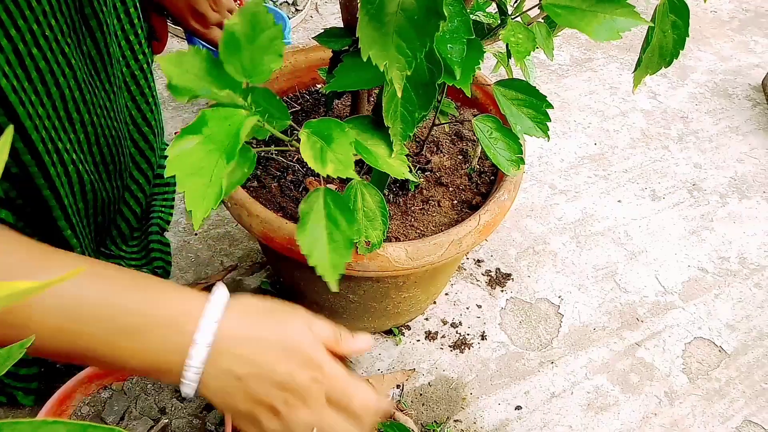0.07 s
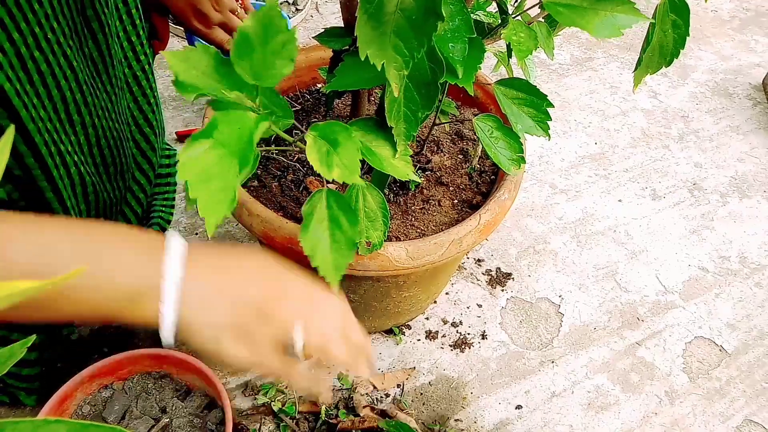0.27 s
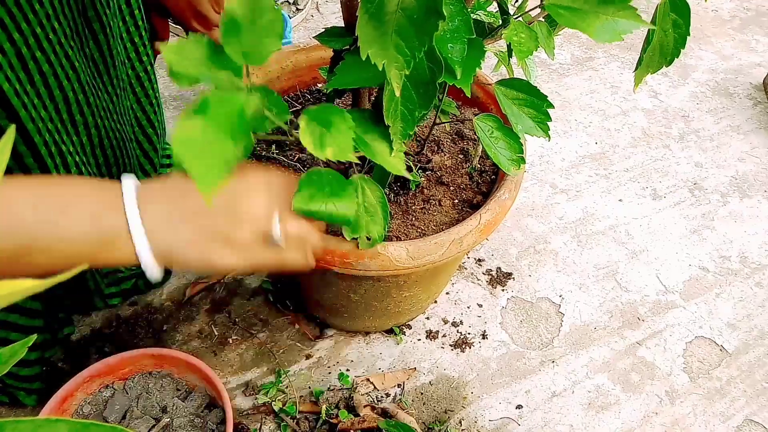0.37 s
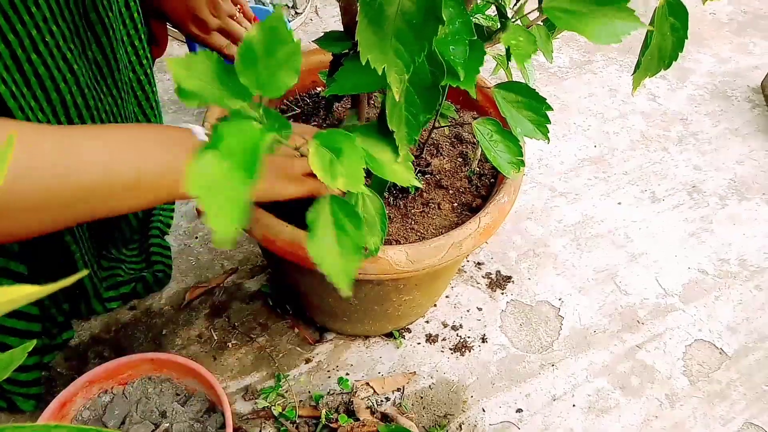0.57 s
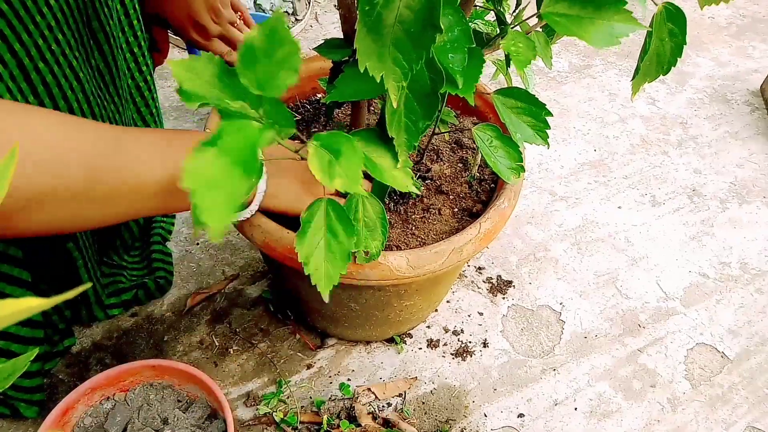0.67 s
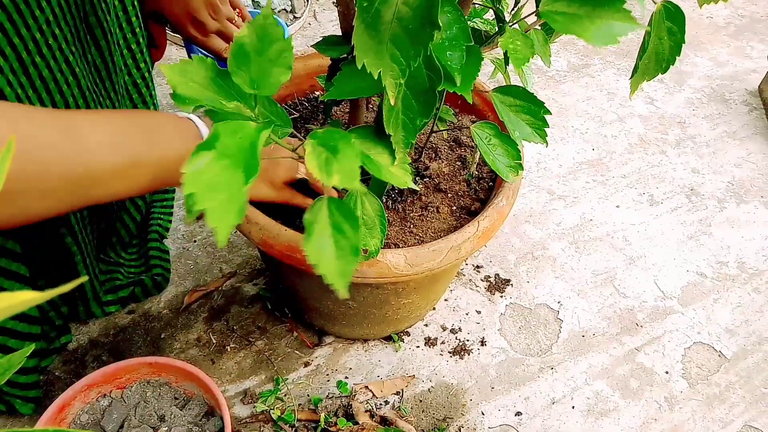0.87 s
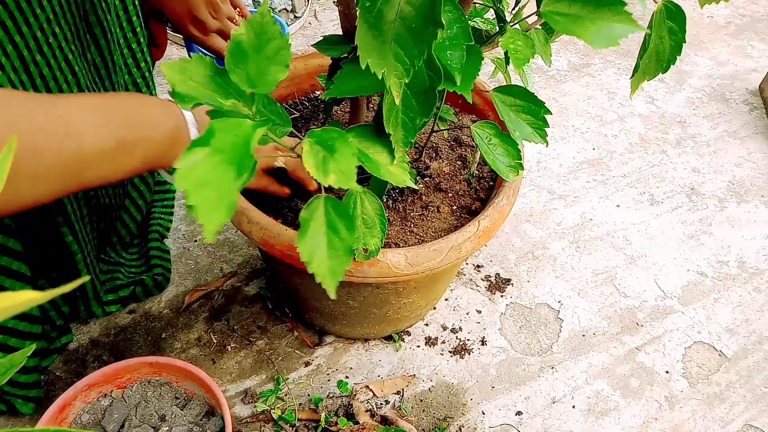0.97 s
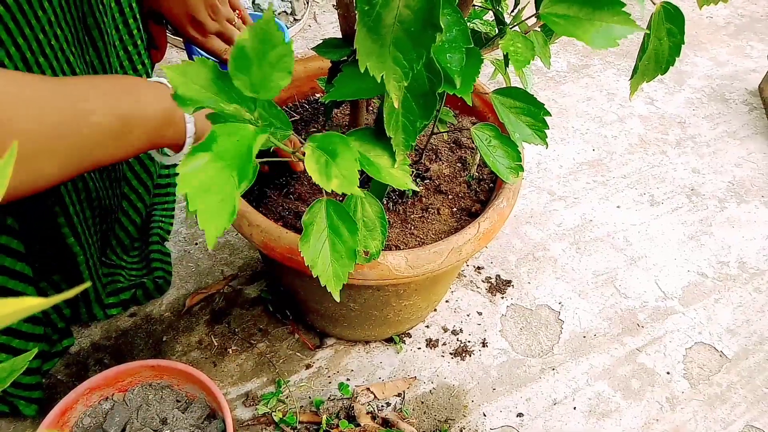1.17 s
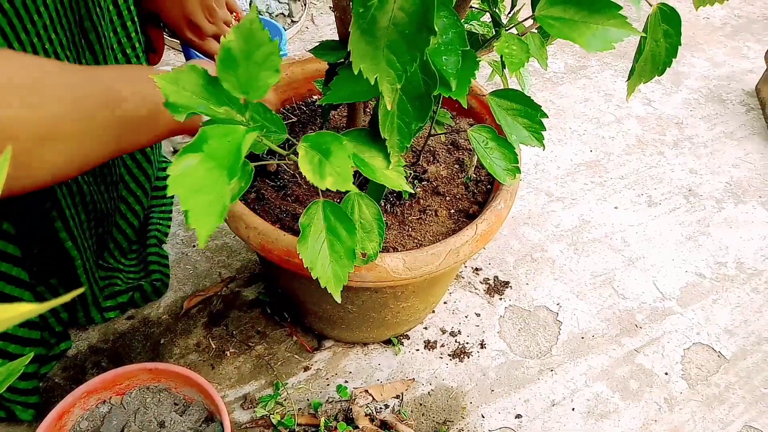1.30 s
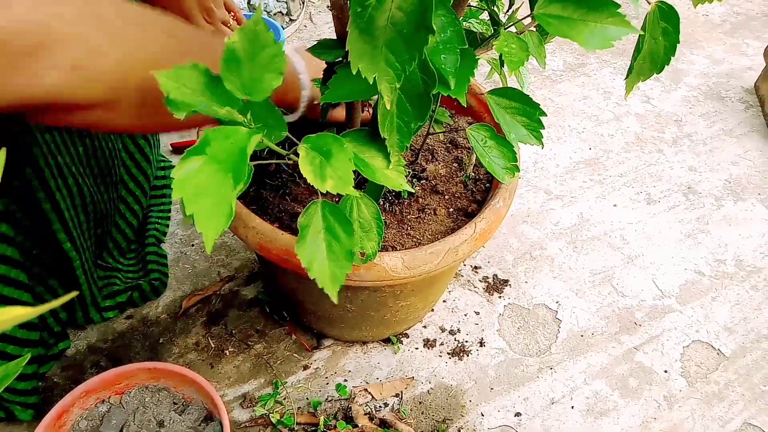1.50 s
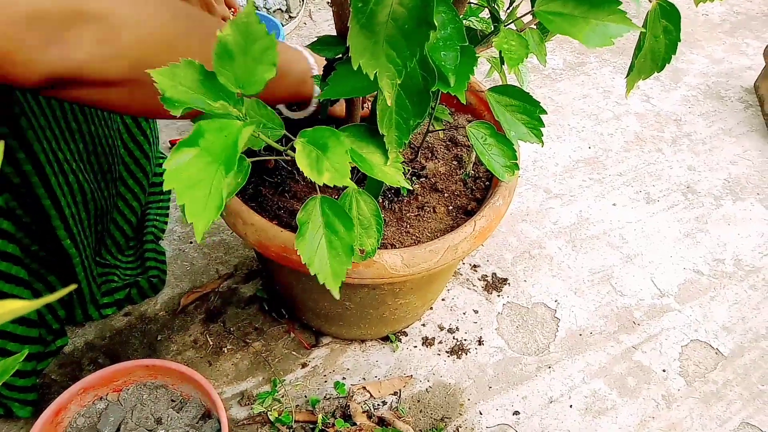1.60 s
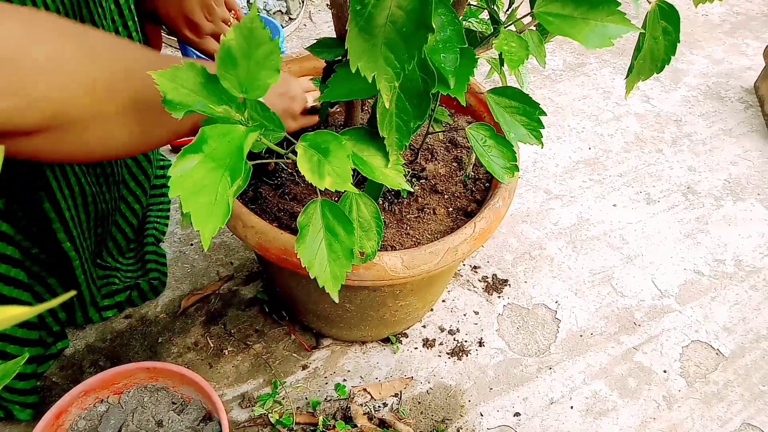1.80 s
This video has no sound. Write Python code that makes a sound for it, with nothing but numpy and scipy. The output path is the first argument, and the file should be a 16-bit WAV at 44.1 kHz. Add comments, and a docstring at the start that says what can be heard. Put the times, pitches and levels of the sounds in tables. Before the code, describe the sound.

Dry leaves crackle and snap as a hand tears them loose close by. A few light, hollow knocks on a flower pot follow, then fingers rustle and scrape in mulch while birds whistle faintly in a quiet yard.

```python
"""A hand grazes a leaf, then tears dry leaves loose close by: stalks snap and soil crumbles, each
fracture a brief, damped vibration. Reaching into a flower pot, something hard, probably a bangle,
knocks on it and excites the modes of its wall and hollow. The hand brushes the wall and the fingers
rustle in the mulch. From about 1.1 s birds whistle faintly, and last the fingers scrape in the mulch.
Throughout, the quiet paved yard adds short echoes, a distant rumble and a high hiss."""
import sys
import numpy as np
from scipy import signal
from scipy.fft import rfft, irfft, next_fast_len
from scipy.io import wavfile
from scipy.ndimage import uniform_filter1d, map_coordinates

SR = 44100
rng = np.random.default_rng(int(sys.argv[2]) if len(sys.argv) > 2 else 0)


def master(y):
    """Save y as 16-bit WAV."""
    cut = np.clip(np.atleast_2d(y).T, -1, 1)
    pcm = np.round(cut * 32767)  # scale
    wavfile.write(sys.argv[1], SR, pcm.astype(np.int16))


N = 81585
T = np.arange(N) / SR
BAND_LIMIT_HZ = 15750

# spectrum of leaves rubbing and tearing: frequency_hz, gain_db
TEAR_SPECTRUM = [(600, -54), (1500, -8.5), (3800, -12.5), (4900, -4), (6300, -2.5), (7700, -7.5),
                 (8900, 4.5), (10400, 5), (12000, -2.5), (15500, -13.5)]


def amp(db):
    """Amplitude ratio of a level in decibels."""
    return 10 ** (np.asarray(db) / 20)


def unit(x):
    """Normalisation to rms 1."""
    return x / np.sqrt(np.mean(x ** 2) + 1e-20)


def along(points, hz):
    """Interpolation of (frequency_hz, value) points on a logarithmic frequency axis."""
    f, v = np.transpose(points)
    return np.interp(np.log(hz + 1), np.log(f + 1), v)


def envelope(rows):
    """Amplitude envelope through (time_s, level_db) rows, silent outside them."""
    return amp(np.interp(T, *np.transpose(rows), left=-np.inf, right=-np.inf))


def wobble(knots_per_s):
    """Smooth random modulation: a spline through Gaussian values."""
    return map_coordinates(rng.standard_normal(int(N * knots_per_s / SR) + 4), [T * knots_per_s])


def filtered(x, response):
    """Linear filtering: the spectrum is multiplied by a frequency response."""
    size = next_fast_len(2 * x.shape[-1])
    return irfft(rfft(x, size) * response(np.fft.rfftfreq(size, 1 / SR)), size)[..., :x.shape[-1]]


def coloured(x, points, size=4096):
    """Minimum-phase filtering to a (frequency_hz, gain_db) shape, by folding the cepstrum."""
    cepstrum = irfft(np.log(amp(along(points, np.fft.rfftfreq(size, 1 / SR)))))
    cepstrum[1:size // 2] *= 2
    cepstrum[size // 2 + 1:] = 0
    return signal.fftconvolve(x, irfft(np.exp(rfft(cepstrum))))[:len(x)]


def cut(x, hz, kind, order=3):
    """Maximally flat high-pass or low-pass filtering."""
    return signal.sosfilt(signal.butter(order, hz, kind, fs=SR, output="sos"), x)


def resonator(x, hz, q):
    """Forced response of a single damped mode of quality factor q."""
    return signal.lfilter(*signal.iirpeak(min(hz, BAND_LIMIT_HZ), q, SR), x)


def modal_response(modes, f):
    """Superposition of (frequency_hz, bandwidth_hz, gain_db) modes of alternating sign."""
    return sum((-1) ** k * amp(db) * 1j * f * width / (hz * hz - f * f + 1j * f * width)
               for k, (hz, width, db) in enumerate(modes))


def add_transient(track, start_s, db, x):
    """Energy scaling: x is mixed in with the energy of 4 ms at the given level."""
    i = round(start_s * SR)
    track[i:i + len(x)] += (amp(db) * x * np.sqrt(.004 * SR / np.sum(x ** 2)))[:N - i]


def crackle(spectrum, per_s, spread_db, rub, top_hz=15000):
    """Tiny fractures ring as damped sinusoids at random times, over friction noise; rms 1."""
    t, t60_s = T[:SR // 50], .005
    when, pitch, size = rng.random((6000, 3))[:int(per_s * N / SR)].T
    rings = np.sin(2 * np.pi * (300 + pitch[:, None] * top_hz) * t) * amp(-60 * t / t60_s)
    rings *= amp(spread_db * np.minimum(-np.log(1 - size), 3))[:, None]
    at = (when * N).astype(int)[:, None] + np.arange(len(t))
    grains = coloured(np.bincount(at.ravel(), rings.ravel(), N + len(t))[:N], spectrum)
    power = np.abs(uniform_filter1d(grains ** 2, size=900))
    grains /= np.sqrt(power + power.mean() / 20)  # evens out the loudness
    friction = unit(coloured(rng.standard_normal(N), spectrum))
    return unit(grains + rub * friction)


def snapping_stalks():
    """Brittle fracture: a burst excites each piece's resonances; thin pieces radiate no bass."""
    # stalks and leaves breaking: start_s, relative_level_db, t60_s, low_cutoff_hz
    breaks = [(.2205, -47, 0.0077, 7000), (0.2341, -21, 0.0058, 5180), (0.2458, -27.5, 0.0055, 6360),
              (0.2482, -21, 0.01, 4250), (.2550, -21, 0.021, 3700), (0.272, -21.5, 0.0069, 4000),
              (.2760, -21, 0.011, 4150), (.2785, -21, 0.007, 620), (0.2825, -31, 0.0054, 4400),
              (0.2839, -20, 0.0051, 4240), (0.2903, -34, 0.012, 3800), (0.3094, -27, .0088, 5330),
              (0.317, -27.5, 0.027, 2640), (0.3218, -28.5, 0.018, 2920), (0.333, -29, 0.016, 3950),
              (0.345, -30.5, 0.0045, 2080), (0.3555, -31.5, 0.014, 3400), (0.3579, -34.5, 0.014, 1380),
              (0.3885, -32.5, 0.01, 2900), (0.393, -36.5, .0083, 4070), (0.4081, -38.5, 0.0056, 4450),
              (0.4148, -28.5, 0.022, 1430), (.4251, -36, 0.043, 1790), (.4490, -34.5, 0.011, 3130),
              (0.4724, -46, 0.0082, 2770), (0.5021, -34, .014, 2680), (0.5285, -34.5, 0.01, 6000),
              (0.586, -43.5, 0.031, 2790), (.5998, -43, 0.0059, 7840), (.623, -49, 0.009, 6000),
              (0.883, -49, 0.028, 2490), (0.8924, -40, 0.0074, 2420), (0.9829, -43, 0.037, 7600),
              (1.0034, -33, 0.007, 3170), (1.0560, -40.5, 0.066, 2900), (1.3175, -58, 0.018, 1350),
              (1.328, -57, 0.015, 3070)]
    # spectrum of a dry leaf breaking: frequency_hz, gain_db
    leaf_spectrum = [(400, -53), (800, -17), (1600, -4), (2400, -6.5), (3800, -3), (4900, -1.5),
                     (6300, -2.5), (7600, -9.5), (8800, -2.5), (10400, -1), (12000, -12), (15500, -8)]
    out, t, rise_s = np.zeros(N), T[:SR // 10], .0004
    for start_s, db, t60_s, low_hz in breaks:
        burst = rng.standard_normal(len(t)) * amp(-60 * t / t60_s) * (1 - np.exp(-t / rise_s))
        burst[round(rise_s * SR)] += 2.05  # the click at the instant of breaking
        main_mode = resonator(burst, 1.29 * low_hz, q=13)
        overtones = sum(resonator(burst, hz, q=20) for hz in rng.uniform(low_hz, 12000, 4))
        piece = coloured(burst + 2.56 * main_mode + 1.84 * overtones, leaf_spectrum)
        add_transient(out, start_s, db - 1.5, cut(piece, low_hz, "high", order=8))
    return out


def tearing_leaves():
    """Friction and fracture: one leaf is grazed, then a handful tears loose and settles."""
    # envelope of the graze: time_s, level_db
    graze_levels = [(.085, -94), (.102, -54.5), (.125, -76), (.15, -87)]
    # envelope of the pull: time_s, level_db
    pull_levels = [(.2, -108), (.228, -53.5), (.244, -55), (.250, -28), (.264, -32), (.278, -21.5),
                   (.298, -34), (.314, -43), (.335, -41), (.375, -41.5), (.43, -46), (.485, -52.5),
                   (.54, -60.5), (.58, -68.5), (.66, -56.5), (.72, -57.5)]
    graze = cut(crackle(TEAR_SPECTRUM, per_s=2300, spread_db=-11, rub=.66), 8260, "high")
    tear = crackle(TEAR_SPECTRUM, per_s=2000, spread_db=3, rub=.8)
    return envelope(graze_levels) * graze + envelope(pull_levels) * tear


def crumbling_soil():
    """Granular fracture: soil breaks into crumbs under the pull."""
    # envelope of the crumbling: time_s, level_db
    levels = [(.24, -60), (.256, -37.5), (.268, -46), (.279, -32), (.296, -48), (.324, -43.5), (.38, -46.5),
              (.425, -49.5), (.49, -57), (.57, -72), (.66, -69.5)]
    # spectrum of the crumbs: frequency_hz, gain_db
    spectrum = [(400, -28.5), (750, -15.5), (1600, 0), (2300, 1), (3600, 5.5), (5000, -2), (9000, -33)]
    return envelope(levels) * crackle(spectrum, per_s=990, spread_db=4.5, rub=.38, top_hz=6000)


def pot_knocks():
    """Impact excitation: a blow and gritty chatter ring the pot's wall and, more slowly, its hollow."""
    # contacts with the pot: start_s, level_db, chatter_t60_s, high_cutoff_hz
    contacts = [(.6772, -24, 0.032, 4970), (.6965, -22, 0.029, 8000), (.7070, -28.5, 0.02, 4360),
                (.7135, -34, 0.027, 3240), (.7350, -41, 0.14, 1930), (.7755, -37, 0.036, 3030),
                (.7825, -40, 0.059, 2530)]
    # modes of the wall: frequency_hz, bandwidth_hz, gain_db
    wall_modes = [(1102, 110, -9), (1324, 80, -6), (1554, 130, -7.5), (2160, 104, 4), (2500, 80, .5),
                  (2710, 130, -6.5), (3210, 270, -4), (3290, 76, 6), (3420, 114, 2.5), (4570, 204, -3),
                  (5270, 138, -9.5), (7000, 600, -32)]
    # modes of the air in the hollow: frequency_hz, t60_s, gain_db
    air_modes = [(601, 0.32, -1.5), (698.5, 0.28, 1.5)]
    out, t, air_rise_s = np.zeros(N), T[:SR // 3], .041
    for start_s, db, t60_s, high_hz in contacts:
        force = (t == 0) + .1 * rng.standard_normal(len(t)) * amp(-60 * t / t60_s)
        wall = filtered(force, lambda f: modal_response(wall_modes, f))
        crack = amp(-21) * cut(force, 770, "high")
        add_transient(out, start_s, db, cut(wall + crack, high_hz, "low", order=4))
        hollow = sum(amp(mode_db - 60 * t / ring_s) * np.sin(2 * np.pi * (hz * t + rng.random()))
                     for hz, ring_s, mode_db in air_modes)
        add_transient(out, start_s, db - 29, hollow * (1 - np.exp(-t / air_rise_s)))
    return out


def mulch_rustle():
    """Friction and fracture: the fingers stir the mulch in short swells."""
    # envelope of the stirring: time_s, level_db
    levels = [(.85, -104), (.875, -50.5), (.895, -50.5), (.925, -55.5), (.975, -64.5), (1.005, -52.5),
              (1.045, -50.5), (1.062, -45), (1.095, -65), (1.15, -61), (1.21, -79), (1.295, -64.5),
              (1.325, -47), (1.36, -60.5), (1.42, -82)]
    # spectrum of the mulch: frequency_hz, gain_db
    spectrum = [(350, -37), (620, -13), (850, -28), (1500, 0), (2000, 6), (3200, 8), (5000, -6), (7500, -2),
                (10000, 13.5), (12500, -7.5), (15500, 6)]
    return envelope(levels) * crackle(spectrum, per_s=2800, spread_db=2, rub=.85, top_hz=14040)


def mulch_scrape():
    """Sliding friction: a steady, gritty rub that slowly grows."""
    # spectrum of the scrape: frequency_hz, gain_db
    spectrum = [(400, -36), (700, -11.5), (1000, -3), (1300, -5), (1750, 3), (2150, 0), (2550, -3),
                (2950, -2), (3500, 0.5), (4100, -7), (5200, -10), (7300, -22.5), (9800, -5), (12500, -21),
                (15500, -21)]
    start_s, rise_s, swell_db_per_s = 1.67, .062, 14.5
    age = T - start_s
    stroke = np.clip(age / rise_s, 0, 1) * amp(-48 + swell_db_per_s * age)
    return stroke * crackle(spectrum, per_s=2600, spread_db=0, rub=1.2, top_hz=7000)


def pot_brush():
    """Resonance driven by friction: the hand draws a short hollow note from the pot wall."""
    # envelope of the brushing: time_s, level_db
    levels = [(.69, -74), (.73, -59), (.79, -55.5), (.85, -72.5), (.95, -72), (.995, -73), (1.033, -54),
              (1.065, -58.5), (1.10, -80)]
    # modes of the brushed wall: frequency_hz, bandwidth_hz, gain_db
    modes = [(613, 38, -0.5), (1360, 155, -4), (1550, 64, 4.5), (2500, 280, -21)]
    return envelope(levels) * unit(filtered(rng.standard_normal(N), lambda f: modal_response(modes, f)))


def bird_tone(start_s, length_s, hz):
    """Random frequency and amplitude modulation make a soft-edged sinusoid waver and flutter."""
    edge_s, waver_hz, flutter_db = .018, 24, 2.6
    gate = np.clip(np.minimum(T - start_s, start_s + length_s - T) / edge_s + .5, 0, 1)
    phase = 2 * np.pi * np.cumsum(hz + waver_hz * wobble(knots_per_s=180)) / SR
    return gate * np.sqrt(2) * np.sin(phase) * amp(flutter_db * wobble(knots_per_s=110))


def birds():
    """Frequency glides: one bird slides down from a high pitch; others hold thin, broken notes."""
    # thin notes: start_s, length_s, first_hz, last_hz, relative_level_db
    notes = [(1.07, .08, 2700, 2660, -67), (1.15, .06, 3660, 3680, -67), (1.14, .10, 3010, 2970, -68),
             (1.12, .09, 3350, 3325, -68), (1.22, .17, 3315, 3340, -60.5), (1.42, .08, 3310, 3340, -60),
             (1.40, .04, 2970, 3000, -63), (1.38, .11, 3670, 3640, -68), (1.55, .15, 3345, 3270, -66.5)]
    # falling whistles: start_s, length_s, top_hz, half_fall_s, peak_level_db
    whistles = [(1.220, 0.084, 3894, .078, -57), (1.461, 0.3, 4010, 0.064, -54.5)]
    floor_hz, peak_s, fade_db_per_s = 1476, .063, 115
    out = np.zeros(N)
    for start_s, length_s, first_hz, last_hz, db in notes:
        hz = np.interp(T, [start_s, start_s + length_s], [first_hz, last_hz])
        out += amp(db - 2.5) * bird_tone(start_s, length_s, hz)
    for start_s, length_s, top_hz, half_fall_s, db in whistles:
        age = np.maximum(T - start_s, 0)
        hz = floor_hz + (top_hz - floor_hz) / (1 + (age / half_fall_s) ** 2.1)
        out += amp(db - fade_db_per_s * np.abs(age - peak_s)) * bird_tone(start_s, length_s, hz)
    return out + amp(-9) * early_reflections(out)


def early_reflections(x, count=8, longest_s=.012):
    """Reflection: the paving and the pots return a few delayed copies."""
    taps = np.zeros(SR // 10)
    taps[(SR * longest_s * rng.uniform(.2, 1, count)).astype(int)] = rng.choice([-1, 1], count)
    return signal.fftconvolve(x, taps / np.sqrt(count))[:N]


def yard_reverb(x):
    """Reverberation: a diffuse tail decays exponentially, the bass lasting longest."""
    # reverberation time of the yard: frequency_hz, t60_s
    decay_times = [(400, 0.87), (2500, 0.31), (6000, 0.49), (14000, 0.29)]
    hz, t, noise = signal.stft(rng.standard_normal(SR // 2), SR, nperseg=256)
    tail = signal.istft(noise * amp(-60 * t / along(decay_times, hz)[:, None]), SR, nperseg=256)[1]
    return signal.fftconvolve(x, tail / np.linalg.norm(tail))[:N]


def background():
    """Ambient noise: a distant rumble whose bass drifts in level, and a band of high hiss."""
    # spectrum of the rumble: frequency_hz, gain_db
    rumble_spectrum = [(20, -12), (48, -44), (65, -6), (110, 0), (170, -4.5), (260, -10.5), (420, -16),
                       (1000, -20.5), (3000, -24.5), (7000, -28), (15000, -53)]
    # spectrum of the hiss: frequency_hz, gain_db
    hiss_spectrum = [(4000, -46), (7800, -20), (8500, 10.5), (9000, 16), (9500, 9), (10600, 15.5),
                     (11300, 14), (12200, -16), (15500, -11)]
    noise = lambda points: unit(filtered(rng.standard_normal(N), lambda hz: amp(along(points, hz))))
    rumble = noise(rumble_spectrum)
    bass = filtered(rumble, lambda hz: 1 / (1 + (hz / 300) ** 2) ** 2)
    drift = amp(2.5 * wobble(knots_per_s=11.32))
    return amp(-68) * (rumble - bass + bass * drift) + amp(-65) * noise(hiss_spectrum)


def scene():
    """Superposition in mid and side: sources are centred; only reverberation and background have width."""
    # filter for the background's side signal: frequency_hz, gain_db
    side_spectrum = [(25, -28), (60, -27), (130, -28), (250, -22), (500, -14), (1500, -5), (4000, 0.5),
                     (8000, -10.5), (15000, -26)]
    near = snapping_stalks() + tearing_leaves() + crumbling_soil() + mulch_rustle()
    near += pot_knocks() + pot_brush() + mulch_scrape()
    far = birds()
    into_yard = amp(-18) * near + amp(-1) * far
    mid = near + amp(-12.5) * early_reflections(near) + far + yard_reverb(into_yard) + background()
    side = .36 * cut(yard_reverb(into_yard), 630, "low", order=1) + coloured(background(), side_spectrum)
    return np.array([mid + side, mid - side])


def record(dry):
    """Band limiting: a steep low-pass removes the highest treble."""
    return filtered(dry, lambda hz: 1 / (1 + (hz / BAND_LIMIT_HZ) ** 120))


dry = scene()
out = record(dry)
master(out)
```